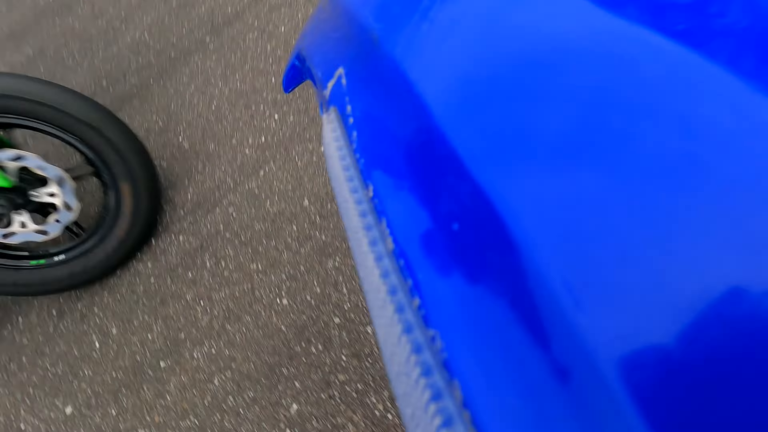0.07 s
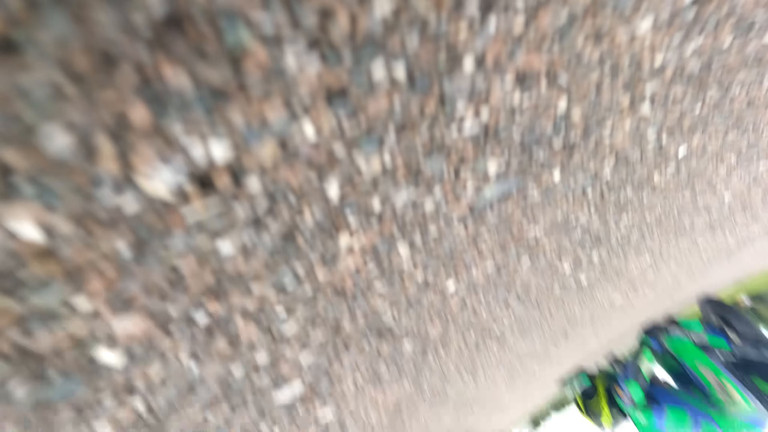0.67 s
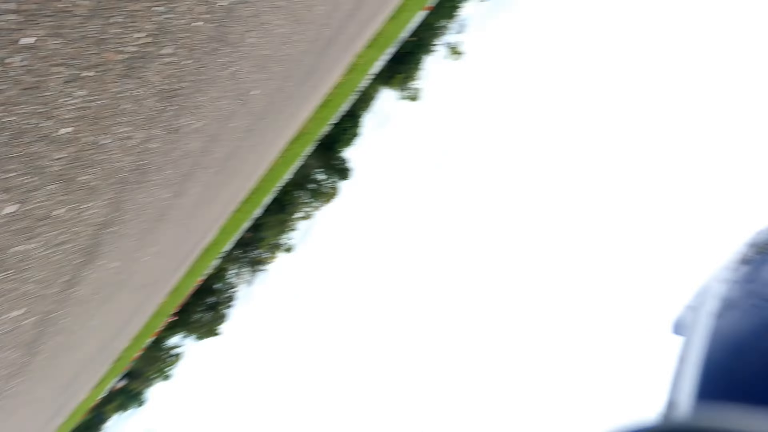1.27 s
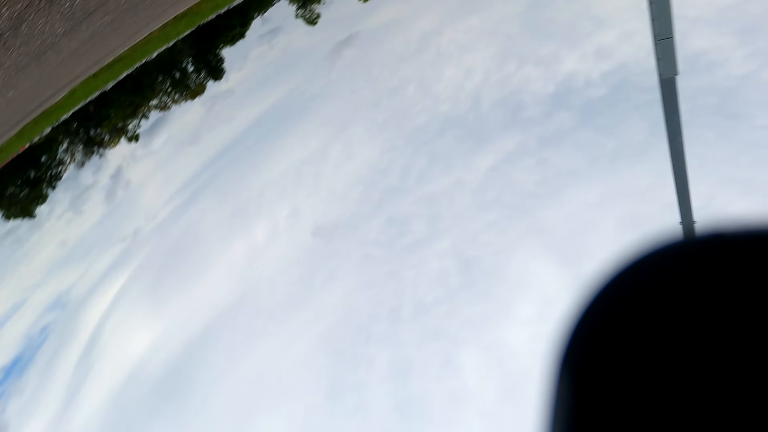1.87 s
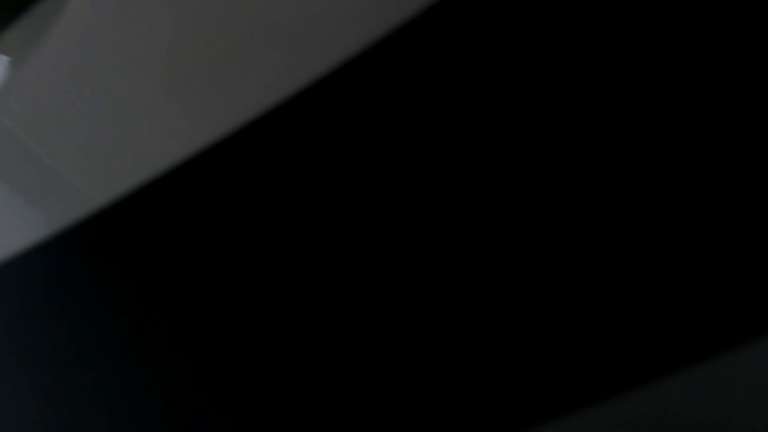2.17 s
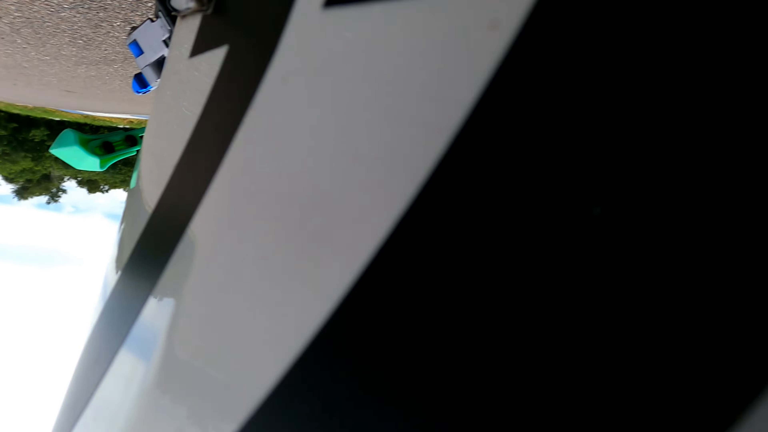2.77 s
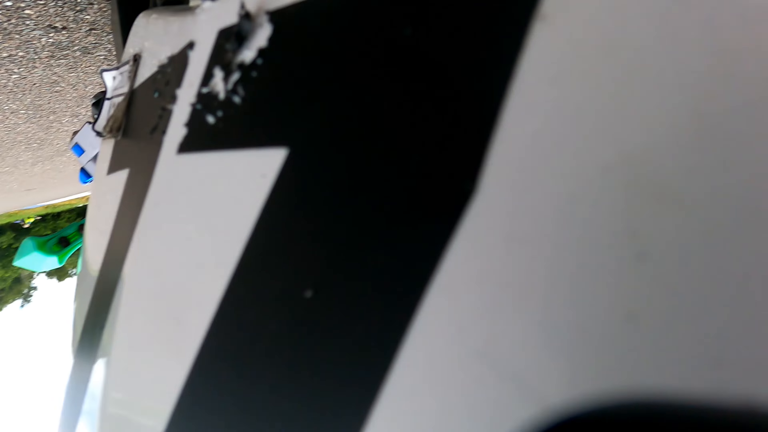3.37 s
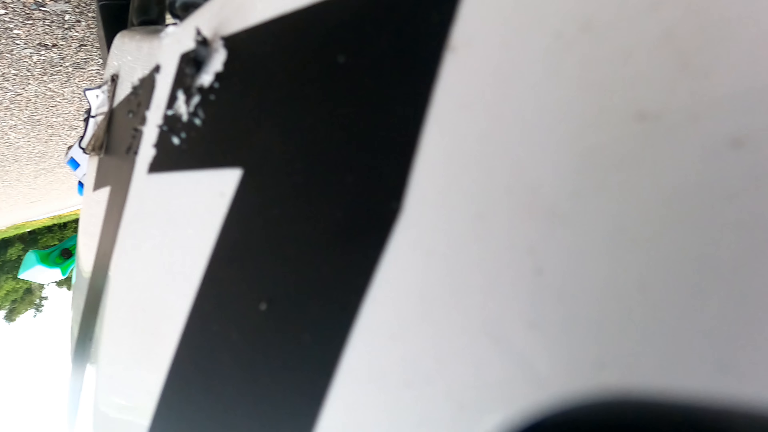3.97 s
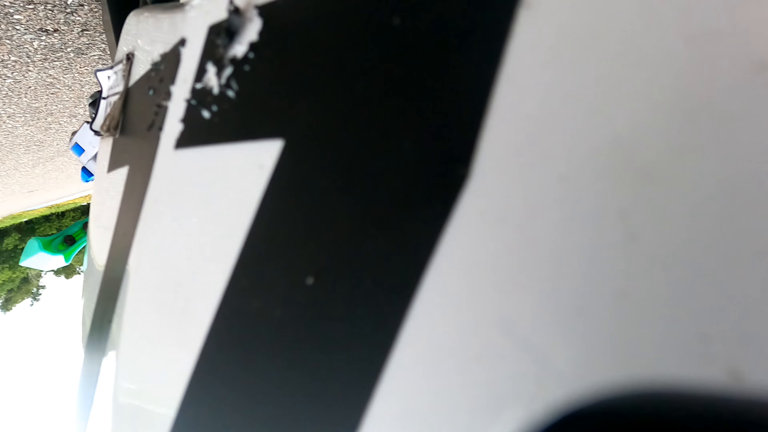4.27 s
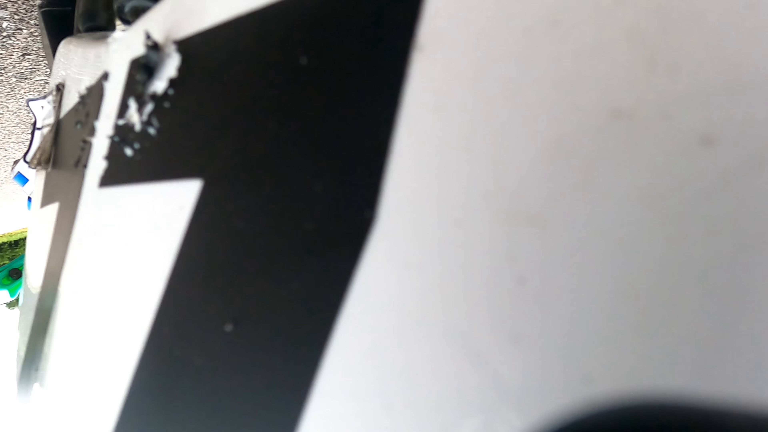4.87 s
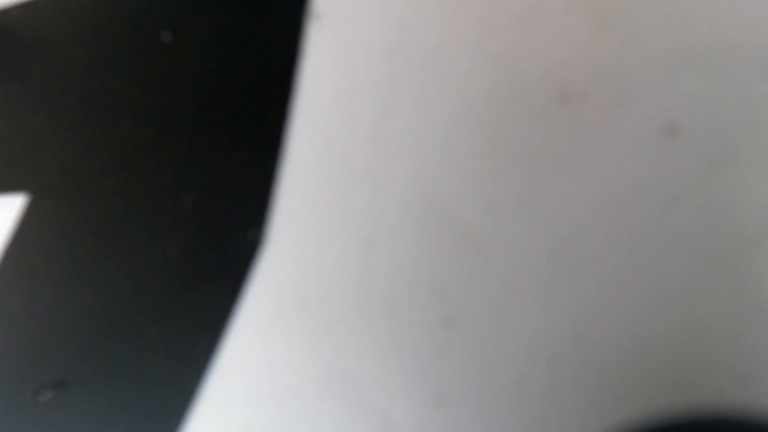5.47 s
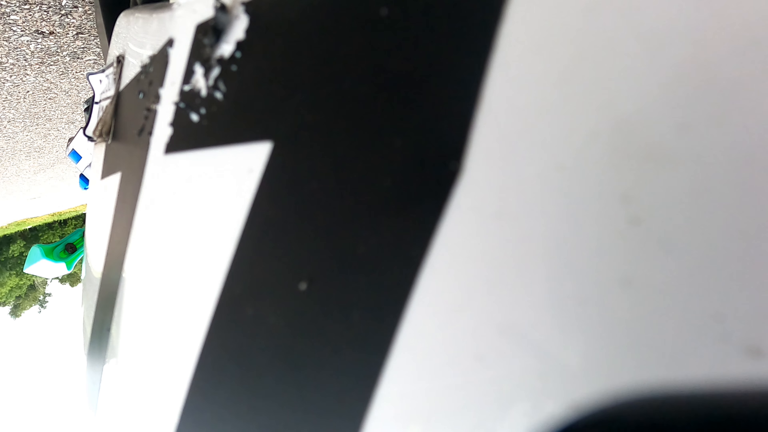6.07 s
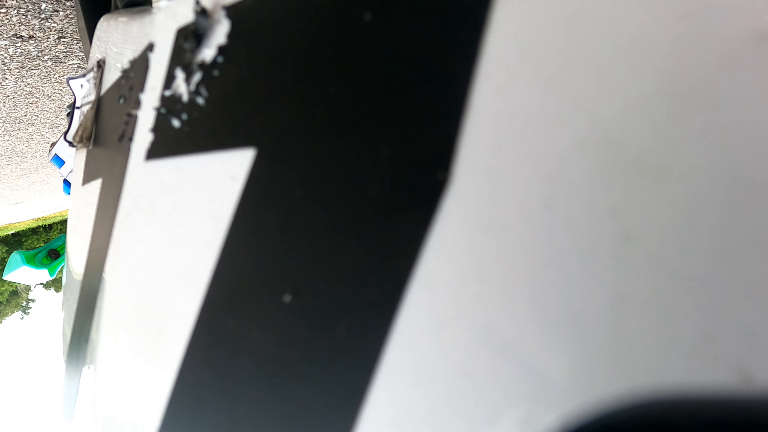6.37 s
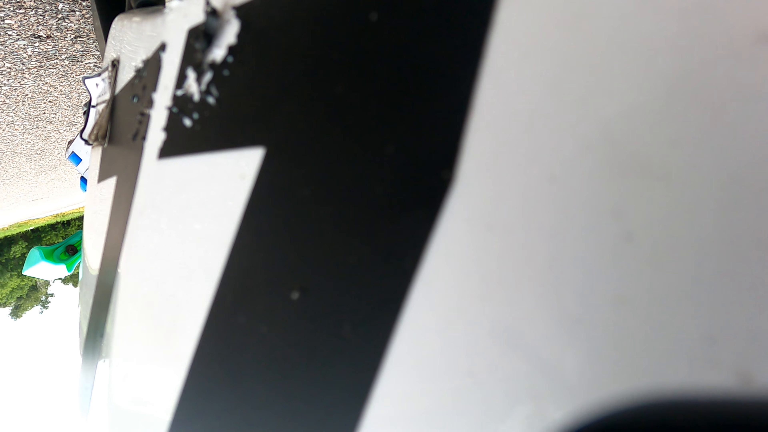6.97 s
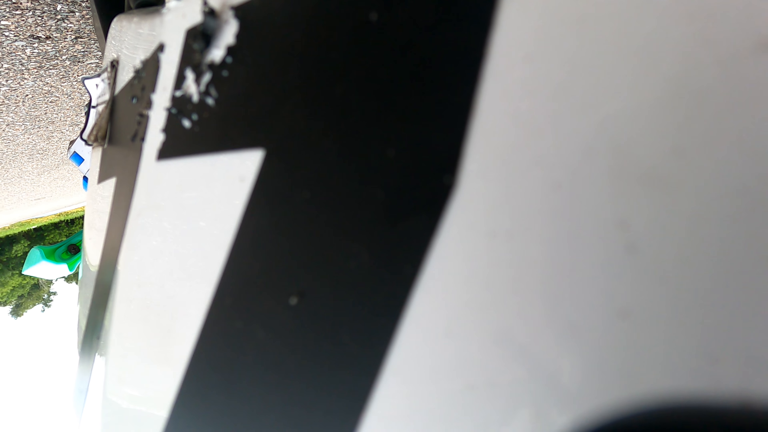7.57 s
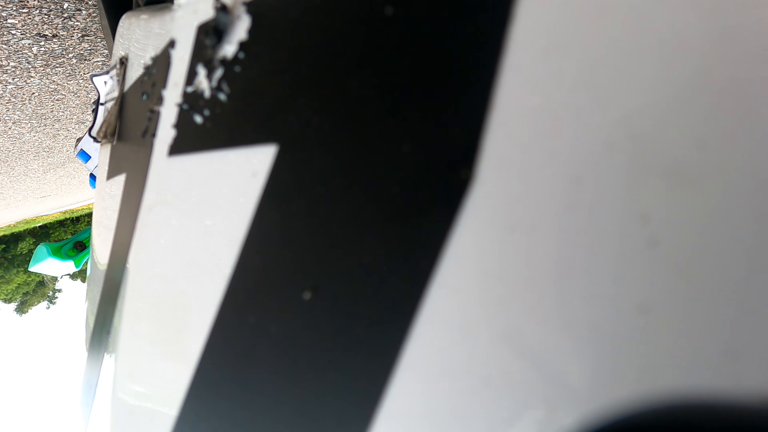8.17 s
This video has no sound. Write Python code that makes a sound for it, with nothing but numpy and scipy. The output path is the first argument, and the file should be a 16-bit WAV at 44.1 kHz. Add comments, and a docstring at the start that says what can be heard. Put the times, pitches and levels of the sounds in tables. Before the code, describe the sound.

Brief engine putter, wind and grinding plastic give way to clattering impacts, then scattered plastic taps over a low, approaching motorcycle drone.

```python
"""A small motorcycle goes down on a race track, heard from a camera that is torn off its bodywork.
First come its exhaust pulses, buffeting wind and the friction of plastic on asphalt. From 0.6 s these
give way to tumbling impacts, and from 2.6 s the swinging camera taps the fairing, exciting its modes.
Every knock swells in briefly before it lands. Other engines drone low and slow behind the knocks;
one draws near from 3.1 s and booms as its throttle shuts at 6.6 s."""
import sys
import numpy as np
from scipy import signal
from scipy.fft import rfft, irfft
from scipy.io import wavfile
from scipy.ndimage import uniform_filter1d

SR = 44100
rng = np.random.default_rng(int(sys.argv[2]) if len(sys.argv) > 2 else 0)


def dump(signal):
    """Clip the signal to [-1, 1] and save it as 16-bit WAV at the path in sys.argv[1]."""
    limited = np.clip(np.atleast_2d(signal).T, -1, 1)
    pcm = np.round(limited * 32767).astype(np.int16)
    wavfile.write(sys.argv[1], SR, pcm)


N = 363384
TIME = np.arange(N) / SR
KNOCK_TIME = np.arange(-3000, 7000) / SR  # seconds either side of contact
LAND_S = 0.001197  # delay from an event's listed time to its landing
THROTTLE_SHUT = np.clip((TIME - 6.6) / 0.1, 0, 1)  # of the near bike: 0 open, 1 shut


# Tumbling blows, each level relative within its own column: (time [s], clack level [dB],
# thud level [dB], body level [dB], crack level [dB], ring frequency [Hz], ping frequency [Hz])
BLOWS = [(0.648, -11, -22.5, -23.5, -24.5, 1500, 3180), (0.735, -34, -44, -45, -42, 1030, 3580),
         (0.847, -8, -21, -19, -23.5, 1004, 3220), (0.858, -6.5, -19.5, -18.5, -27, 954, 2540),
         (1.14, -8.5, -22, -25, -21.5, 1320, 2780), (1.174, -21, -24, -33, -55, 1410, 2760),
         (1.434, -7.5, -19.5, -14, -21, 214, 2586), (1.609, -6.5, -19.5, -20, -23.5, 283, 2720),
         (1.863, -13, -19.5, -13.5, -26.5, 643, 2740), (1.892, -11.5, -20.5, -22.5, -33, 756, 2580),
         (1.913, -25, -19.5, -28, -43, 248, 2790), (1.967, -14.5, -28, -24, -35.5, 840, 2720),
         (2.217, -21, -23.5, -20, -27, 466, 2170), (2.23, -9, -21, -16.5, -23, 710, 2900),
         (2.277, -33, -26.5, -39, -28.5, 285, 2840), (2.368, -7.5, -16.5, -17, -17.5, 210, 2170),
         (2.392, -7, -19.5, -24, -21.5, 1340, 2900), (2.89, -6, -17.5, -18, -18, 1030, 2840),
         (3.11, -6, -31, -19.5, -25.5, 683, 2810), (3.191, -17.5, -32, -22.5, -41, 598, 2730),
         (3.469, -22, -29, -35, -52, 417.3, 2120), (3.678, -8.5, -31, -21.5, -29, 820, 2050),
         (3.753, -13.5, -28.5, -24.5, -39.5, 1027, 2650), (4.481, -33, -39, -41, -44, 1040, 2880),
         (4.817, -5.5, -24, -16.5, -27, 828, 2620)]
# Band limits, of which the last five bound body, clack, crack and fizz: (frequency [Hz])
BLOW_EDGES = [20, 200, 800, 2000, 5000, 16000]
# Mean response of a struck spot: (frequency [Hz], gain [dB])
BLOW_RESPONSE = [(20, -2), (110, -22), (480, -9), (710, -7.5), (1050, 3), (1300, -1.5), (1770, -3.5),
                 (2400, -16), (2860, -13), (3700, -24.5), (4700, -39.5), (6200, -56.5), (8300, -55),
                 (9800, -65.5), (16000, -87)]
def tumble(click=9, rise_s=0.011, lead=0.72, fizz_growth=1.48, fizz_fade_db_per_s=3.5):
    """Impact excitation: each blow lands on another spot and drives that spot's own resonances."""
    t, out = KNOCK_TIME, np.zeros(N)
    hz = bins(t)
    for s, clack_db, thud_db, body_db, crack_db, ring_hz, ping_hz in BLOWS:
        ripple_db = 4 * np.interp(hz, np.arange(0, 16000, 130), rng.standard_normal(124))
        spot = read(BLOW_RESPONSE, hz) * amp(ripple_db)
        noise = rng.standard_normal(len(t))
        contact = click * (t == 0) * rng.choice([-1, 1]) + 1.2 * noise * dying(0.0021)
        sound = sized(thud(hz=42, decay_s=0.024, rattle=1.4), thud_db + 1)
        sound += ring(ring_hz, body_db - 9.5, t60=0.042) + ring(ping_hz, crack_db - 11.5, t60=0.019)
        # only the hardest landings fizz, and less as the tumble slows
        fizz_db = fizz_growth * crack_db - 7 - fizz_fade_db_per_s * s
        # (level [dB], contact weight, decay time [s], swell weight)
        parts = [(body_db - 8.5, 0.9, 0.012, 0.13),
                 (clack_db - 20, 0.83, 0.0089, 0.4),
                 (crack_db - 9.5, 0.85, 0.011, 0.6),
                 (fizz_db, 0.6, 0.004, 0.3)]
        for (db, sharp, decay_s, ahead), lo, hi in zip(parts, BLOW_EDGES[1:], BLOW_EDGES[2:]):
            drive = sharp * contact + noise * (0.47 * dying(decay_s) + lead * ahead * swell(rise_s))
            sound += sized(irfft(rfft(drive) * spot * band(hz, lo, hi)), db)
        add(out, s + LAND_S + t[0], sound)
    return out


def thud(hz, decay_s, rattle):
    """Damped oscillation: the camera mount gives way, flexes for a cycle or two and rattles."""
    t = KNOCK_TIME
    flex = np.cos(2 * np.pi * hz * rng.uniform(0.78, 1.1) * t) * (dying(decay_s) - dying(0.0034))
    shake = rng.standard_normal(len(t)) * (dying(0.01) - dying(0.0037))
    # (frequency [Hz], gain [dB])
    mount = [(8, -27.5), (40, -0.5), (130, -2), (200, -12), (400, -16), (1500, -68.5), (5000, -130)]
    return unit(flex) + rattle * unit(colour(shake, mount))


def ring(hz, db, t60, rise_s=0.0068, corner_hz=1500, attack_s=0.00054):
    """Free vibration of one mode of a struck spot; the higher it is, the more it swells in first."""
    t = KNOCK_TIME
    tail = dying(t60 / np.log(1000)) * (1 - np.exp(-(t / attack_s) ** 2))
    lead = 0.8 * hz / (hz + corner_hz) * swell(rise_s)
    waver = uniform_filter1d(wander(hz / 12, len(t)), size=40)  # loose plastic never holds one pitch
    return sized(np.sin(2 * np.pi * hz * t + waver) * (tail + lead), db)


# Modes of a hollow part: (frequency [Hz], level [dB], 60 dB decay time [s])
HOLLOW_MODES = [(44.3, -22, .095), (117, -22, .14), (762, -25, 0.15), (955, -25.5, .16), (1990, -39, .027)]
def hollow(struck_s=4.818, attack_s=0.00055):
    """Modal decay: the last blow finds a hollow part, which rings on in damped sinusoids."""
    t, out = KNOCK_TIME, np.zeros(N)
    for hz, db, t60 in HOLLOW_MODES:
        envelope = dying(t60 / np.log(1000)) - dying(attack_s)
        add(out, struck_s + t[0], sized(np.sin(2 * np.pi * hz * t) * envelope, db))
    return out


# Camera swings against the fairing, with their rebounds: (time [s], relative strength [dB])
TAPS = [(2.564, -5.5), (2.625, -9.5), (3.36, -3.5), (3.43, -6), (4.155, -6), (4.212, -7), (5.09, -6.5),
        (5.128, -9), (5.166, -28.5), (6.13, -2.5), (6.198, -8), (6.233, -17.5), (6.271, -16), (6.474, -7),
        (6.554, -8), (6.624, -20), (7.058, -8.5), (7.1, -9.5), (7.133, -15), (7.37, -6), (7.429, -13),
        (7.666, -13.5), (7.711, -19)]
# Modes of the fairing: (frequency [Hz], relative level [dB], 60 dB decay time [s])
FAIRING_MODES = [(428.3, -17, 0.12), (599, -17, 0.063), (683, -13, 0.063), (890, -24.5, 0.018),
                 (951.4, -15.5, 0.098), (1091, 0, 0.0094), (1226, 4, 0.0089), (1345, -5, 0.035),
                 (1577, -14.5, 0.059), (1687, -12.5, 0.03), (1886, -13.5, 0.045), (2067, -15.5, 0.04),
                 (2620, -11.5, 0.052), (2964, 4, 0.012), (3140, -14, 0.062), (3766, -6.5, 0.028)]
# Filter for a tap's crack: (frequency [Hz], gain [dB])
TAP_CRACK = [(900, -63), (2000, -0.5), (2450, -8), (2750, 5), (3100, -0.5), (3800, -3.5), (4300, -14),
             (5200, -28), (8000, -37.5), (10500, -48.5), (16000, -67)]
def taps(rise_s=0.0076, land_s=0.0018, crack_growth=1.73, thud_growth=0.6, dulling_db_per_s=3):
    """Modal superposition: one panel rings at every tap; hard taps crack, soft ones mostly thud."""
    t, out = KNOCK_TIME, np.zeros(N)
    hz = bins(t)
    rebounds = np.diff([s for s, _ in TAPS], prepend=0) < 0.1
    for (s, strength), rebound in zip(TAPS, rebounds):
        panel = sum(amp(db + 2 * rng.standard_normal()) * np.sin(2 * np.pi * f * t)
                    * dying(t60 / np.log(1000)) for f, db, t60 in FAIRING_MODES)
        panel *= 1 - dying(0.00067)  # soft plastic takes a moment to load
        panel_noise = abs(rfft(panel)) * rfft(rng.standard_normal(len(t)))
        swell_gain = amp(-7 * rebound)  # the swell is faint on rebounds
        lead = unit(irfft(panel_noise * band(hz, 860, 9000, order=2)) * swell(rise_s))
        linger = unit(irfft(panel_noise * band(hz, 210, 630, order=2)) * dying(0.056))
        vibration = unit(panel) + amp(-6) * swell_gain * lead + amp(-17) * linger
        clack = sized(irfft(rfft(vibration) * band(hz, 330, 1800, order=8)), strength - 14)
        chatter = rng.standard_normal(len(t))
        chatter *= dying(0.002) + 0.43 * dying(0.0064) + swell_gain * swell(rise_s)
        crack = 1.03 * unit(colour(vibration, TAP_CRACK)) + unit(colour(chatter, TAP_CRACK))
        # the taps dull as the swinging dies down
        crack_db = -20 + crack_growth * strength - dulling_db_per_s * (s - TAPS[0][0])
        case_ping = ring(hz=3180, db=crack_db - 8, t60=0.03)
        mount = sized(thud(hz=43.4, decay_s=0.032, rattle=0.71), thud_growth * strength - 20.5)
        add(out, s + land_s + t[0], clack + sized(crack, crack_db) + case_ping + mount)
    return out


# Spectrum of bodywork grinding on asphalt: (frequency [Hz], level [dB])
GRIND_SPECTRUM = [(60, -31), (200, -2.5), (400, -5.5), (630, -8), (1050, -9), (1480, -8.5), (2250, -27.5),
                  (2950, -24), (4000, -32), (5500, -45), (8500, -52.5), (10000, -62.5), (16000, -80)]
def slide(steady_db=-24, dig_db=15, dig_s=0.069, lift_s=0.594, lift_db_per_s=900):
    """Sliding friction: plastic catches unevenly, digs in, and falls silent as the camera lifts off."""
    db = steady_db + dig_db * np.exp(-abs(TIME - lift_s) / dig_s)
    db -= lift_db_per_s * np.maximum(TIME - lift_s, 0)
    scratches = grit(per_s=5000, spread_db=2.1) * amp(3 * wander(130.3))
    stones = 0.43 * grit(per_s=320, spread_db=3.8)
    return unit(colour(scratches + stones, GRIND_SPECTRUM)) * amp(db)


# Edges snagging during the slide: (time [s], burst level [dB], ring frequency [Hz])
SNAGS = [(0.0034, -14.5, 1386), (0.0477, -11.5, 1010), (0.0818, -16.5, 2840), (0.1284, -17.5, 1045),
         (0.1405, -14, 1047), (0.159, -19.5, 1060), (0.2029, -19, 1120), (0.234, -20, 990),
         (0.2814, -16, 1028), (0.4668, -19, 1077), (0.4897, -22, 1560), (0.5406, -15.5, 937),
         (0.585, -19, 955)]
# Spectrum of a snag: (frequency [Hz], level [dB])
SNAG_SPECTRUM = [(200, -23), (600, -7.5), (1100, 3), (1500, 3), (2250, -9), (2950, -5.5), (4000, -16),
                 (5500, -22), (8300, -29), (10000, -49.5), (16000, -62)]
def snags(grip_s=0.0054):
    """Transient excitation: an edge catches and lets go in a gritty burst, and its panel rings."""
    bursts = sum(amp(db) * np.exp(-abs(TIME - s - LAND_S) / grip_s) for s, db, _ in SNAGS)
    out = unit(colour(grit(per_s=6000, spread_db=2.8), SNAG_SPECTRUM)) * bursts
    for s, db, hz in SNAGS:
        add(out, s + LAND_S + KNOCK_TIME[0], ring(hz, db - 11, t60=0.047))
    return out


# Plastic rubbing along:
# (peak time [s], duration [s], level [dB], centre frequency [Hz], half-width [octaves])
RUBS = [(1.511, 0.059, -36.5, 2400, 3), (1.526, 0.066, -24.5, 110, .84), (2.176, 0.02, -43, 1390, 0.77),
        (2.705, 0.05, -42.5, 1398, 0.8), (3.223, .11, -32.5, 720, 0.52), (3.489, 0.038, -39.5, 816, .5),
        (3.682, 0.035, -30, 600, 0.57), (3.772, 0.13, -28.5, 600, 0.73), (4.52, 0.096, -46.5, 1500, 1.85),
        (5.415, 0.045, -41.5, 1120, 0.62), (5.619, 0.072, -47, 1250, 0.84), (5.89, 0.077, -44, 790, 0.86)]
def rubs():
    """Friction noise: short grainy strokes, each filtered by its own resonance."""
    t, out = np.arange(-8192, 8192) / SR, np.zeros(N)
    hz = bins(t)
    grains = grit(per_s=3000, spread_db=1.8)
    for s, length_s, db, centre_hz, octaves in RUBS:
        stroke = grains[round(s * SR):][:len(t)]
        resonance = band(hz, 20, 3900) / (1 + (np.log2(hz / centre_hz) / octaves) ** 4)
        envelope = amp(db) * np.exp(-(2 * t / length_s) ** 2)
        add(out, s + t[0], unit(irfft(rfft(stroke) * resonance)) * envelope)
    return out


def grit(per_s, spread_db):
    """Shot noise: stones of uneven size catch on plastic at random instants."""
    sizes = amp(spread_db * np.minimum(rng.exponential(1, N), 4))
    return unit(rng.standard_normal(N) * sizes * (rng.random(N) < per_s / SR))


# Spectrum of wind on the camera case: (frequency [Hz], level [dB])
BUFFET_SPECTRUM = [(5, -43), (28, 4), (60, 5), (130, -1.5), (220, -10), (350, -20), (700, -39.5),
                   (2000, -98), (6000, -130)]
def wind(start_db=-29, full_db=-14.5, rise_s=0.19, drop_s=0.555, drop_db_per_s=164):
    """Turbulent pressure: wind buffets the case, building up and then dying with the bike's speed."""
    db = np.interp(TIME, [0, rise_s], [start_db, full_db]) - drop_db_per_s * np.maximum(TIME - drop_s, 0)
    return unit(colour(rng.standard_normal(N), BUFFET_SPECTRUM)) * amp(db)


# Engine of the falling bike: (time [s], firing rate [Hz], level [dB])
FALLING_RUN = [(0, 64, -20), (.12, 59, -27.5), (.22, 57, -19), (.33, 65, -20), (.45, 67, -25),
               (.55, 84, -15.5), (.6, 71, -21), (.66, 82, -57)]
# Response of its exhaust: (frequency [Hz], gain [dB])
FALLING_PIPE = [(5, -55.5), (30, -1), (70, 8), (140, 4.5), (240, -0.5), (500, -22), (1500, -62.5),
                (5000, -130)]
def falling_bike():
    """Pitch follows firing rate: the engine revs unevenly upward and is gone as the tumble begins."""
    return exhaust(*running(FALLING_RUN), FALLING_PIPE, rough=0.5, limp=0.13)


def exhaust(hz, db, pipe, rough, limp):
    """Source and filter: one pulse a firing, uneven and alternately strong and weak, drives a pipe."""
    firings = np.flatnonzero(np.diff(np.floor(np.cumsum(hz) / SR)))
    chance = rng.standard_normal(N)[:len(firings)]
    pulses = np.zeros(N)
    pulses[firings] = 1 + rough * chance + limp * (-1) ** np.arange(len(firings))
    # the silencer delays the higher frequencies, which rounds each pulse into a putter
    dispersion = np.exp(-1j * (bins(pulses) / 85) ** 2)
    putter = irfft(rfft(pulses) * read(pipe, bins(pulses)) * dispersion)
    return unit(putter) * amp(db + 2.4 * wander(5.6))


# Engine of the bike that draws near: (time [s], firing rate [Hz])
NEAR_RUN = [(3.5, 55.3), (4, 51), (4.5, 51.4), (5.05, 51.4), (5.6, 57.8), (6.2, 60.2), (6.55, 55),
            (6.78, 50.2), (7.2, 48.6), (7.7, 46.9), (8.24, 42.8)]
# Its drone: (harmonic number, relative level [dB])
NEAR_HARMONICS = [(2, -14), (3, 1.5), (4, -2.5), (5, -10.5), (6, -17.5), (7, -24.5)]
# Response of its exhaust: (frequency [Hz], gain [dB])
NEAR_PIPE = [(5, -75.5), (45, -23.5), (90, -9.5), (125, 7), (160, 3), (200, -4), (250, -16), (320, -21),
             (450, -22.5), (600, -36), (900, -46), (2000, -72), (5000, -130)]
# Spectrum of its rasp: (frequency [Hz], level [dB])
RASP_SPECTRUM = [(300, -39.5), (1100, -1.5), (2300, -2), (4000, -9), (6000, -18.5), (9000, -28),
                 (11000, -42), (16000, -63.5)]
def near_bike(from_s=3.13, fade_s=0.72, approach_db_per_s=4, rev_db_per_hz=0.26, boom_db=4):
    """Harmonic series: a drone on the firing rate grows with approach, over a putter and a rasp."""
    hz, = curves(NEAR_RUN)
    db = -42.5 + approach_db_per_s * (TIME - from_s) + rev_db_per_hz * (hz - hz.mean())
    cycles = np.cumsum(hz) / SR + 0.028 * wander(25)
    harmonics = sum(amp(level + 1.6 * wander(14)) * np.cos(2 * np.pi * k * cycles)
                    for k, level in NEAR_HARMONICS)
    drone = unit(harmonics) * amp(db - 4 + boom_db * THROTTLE_SHUT)
    puffs = rng.standard_normal(N) * (0.5 + np.exp(-(cycles % 1) / 0.27))
    rasp_db = -59 + 3.3 * (db - db.max())  # the rasp carries only from close by
    rasp = unit(colour(puffs, RASP_SPECTRUM)) * amp(rasp_db)
    putter = exhaust(hz, db - 4, NEAR_PIPE, rough=0.79, limp=0.3)
    return (drone + putter + rasp) * np.clip((TIME - from_s) / fade_s, 0, 1)


# Engine of a bike far down the track: (time [s], firing rate [Hz], level [dB])
FAR_RUN = [(.6, 65, -58), (.95, 67, -54), (1.3, 56.5, -48), (2.1, 67, -47), (2.7, 59, -45),
           (3.4, 55, -40.5), (4, 51, -46.5), (4.8, 26, -62.5)]
# Response of its exhaust: (frequency [Hz], gain [dB])
FAR_PIPE = [(5, -52), (30, -15.5), (60, 2), (120, 4), (190, -1), (300, -9), (600, -34.5), (1500, -60),
            (5000, -130)]
def far_bike():
    """Pipe filtering: the lowest harmonics of a distant exhaust come through as a faint drone."""
    return exhaust(*running(FAR_RUN), FAR_PIPE, rough=0.43, limp=0.16)


# Spectrum of distant track noise: (frequency [Hz], level [dB])
AIR_SPECTRUM = [(20, -2), (60, 21), (200, 8), (400, 4), (750, -3.5), (1400, -7), (2000, -12.5),
                (2500, -15.5), (3800, -19), (4600, -29), (6000, -35.5), (9000, -40.5), (11000, -64.5),
                (16000, -66.5)]
# Resonances of the camera case: (frequency [Hz], width [Hz], gain [dB])
CASE_RESONANCES = [(1053, 110, 16), (2130, 54, 0.5), (2900, 130, 10.5), (4210, 130, 2.5)]
def air(base_db=-45.5, swell_at_s=5.3, swell_width_s=1.5):
    """Resonant filtering: the camera case colours distant track noise, which has one broad swell."""
    noise = rng.standard_normal(N)
    hz = bins(noise)
    case = amp(sum(db / (1 + (2 * (hz - f) / width) ** 2) for f, width, db in CASE_RESONANCES))
    wash = unit(irfft(rfft(noise) * read(AIR_SPECTRUM, hz) * case))
    swell_db = 4 * np.exp(-((TIME - swell_at_s) / swell_width_s) ** 2)
    thinning_db = -2.5 * THROTTLE_SHUT
    return wash * amp(base_db + swell_db + thinning_db + 1.5 * wander(27))


def amp(db):
    """Decibels to amplitude ratio."""
    return 10 ** (np.asarray(db) / 20)


def unit(x):
    """Normalisation to rms 1."""
    return x / np.sqrt(np.mean(x ** 2) + 1e-20)


def sized(x, db):
    """Equal energy: a knock gets the energy of 40 ms at this level."""
    return amp(db) * x * np.sqrt(0.04 * SR / (np.sum(x ** 2) + 1e-20))


def bins(x):
    """Frequencies of a sound's Fourier spectrum, kept just above zero."""
    return np.fft.rfftfreq(len(x), 1 / SR) + 1e-3


def read(points, hz):
    """Gain interpolated from a (frequency [Hz], gain [dB]) table on a log-frequency axis."""
    f, db = np.transpose(points)
    return amp(np.interp(np.log(hz), np.log(f), db))


def colour(x, points):
    """Zero-phase filtering by a (frequency [Hz], gain [dB]) table."""
    return irfft(rfft(x) * read(points, bins(x)), len(x))


def band(hz, lo_hz, hi_hz, order=6):
    """Gain of a soft-edged pass band."""
    return 1 / (1 + (lo_hz / hz) ** order) / (1 + (hz / hi_hz) ** order)


def curves(rows):
    """Linear interpolation of a timed table's columns at every sample."""
    s, *columns = np.transpose(rows)
    return [np.interp(TIME, s, c) for c in columns]


def running(rows):
    """An engine's firing rate and level at every sample, silent outside its run."""
    hz, db = curves(rows)
    return hz, np.where((TIME >= rows[0][0]) & (TIME <= rows[-1][0]), db, -120)


def wander(per_s, size=N):
    """Random modulation: straight lines between Gaussian values."""
    knots = rng.standard_normal(8192)
    return np.interp(np.arange(size) * per_s / SR, np.arange(len(knots)), knots)


def swell(rise_s, release_s=0.0007):
    """Exponential growth towards a knock, easing just before contact."""
    ahead = np.maximum(-KNOCK_TIME, 0)
    return np.exp(-ahead / rise_s) * (1 - np.exp(-(ahead / release_s) ** 2))


def dying(decay_s):
    """Exponential decay from the moment of contact."""
    return np.exp(-abs(KNOCK_TIME) / decay_s) * (KNOCK_TIME >= 0)


def add(mix, s, sound):
    """Superpose a sound on the mix from time s."""
    at = round(s * SR)
    part = mix[max(at, 0):max(at + len(sound), 0)]
    part += sound[max(-at, 0):][:len(part)]


def scene():
    """Superposition: all sources sum at one microphone."""
    engines = falling_bike() + far_bike() + near_bike()
    return (engines + wind() + slide() + snags() + tumble() + hollow() + taps() + rubs() + air())[None]


def record(dry, cutoff_hz=15800):
    """Soft saturation rounds off peaks near full scale; a low-pass filter then limits the band."""
    limited = dry / (1 + dry ** 8) ** (1 / 8)
    low_pass = signal.firwin(511, cutoff_hz, window=("kaiser", 9), fs=SR)
    return signal.oaconvolve(limited, low_pass[None], "same")


dry = scene()
out = record(dry)
dump(out)
```